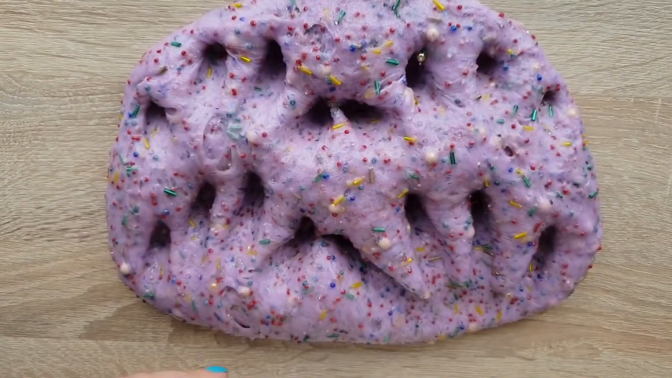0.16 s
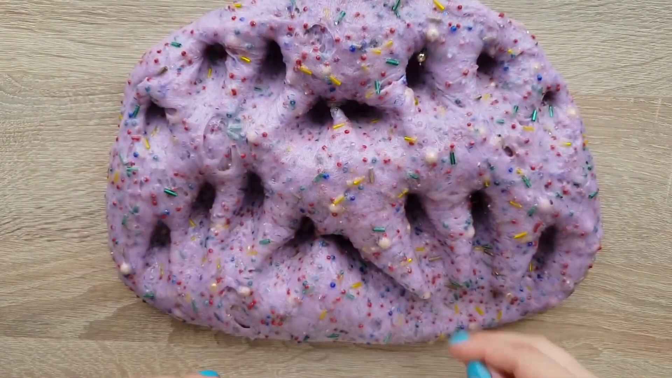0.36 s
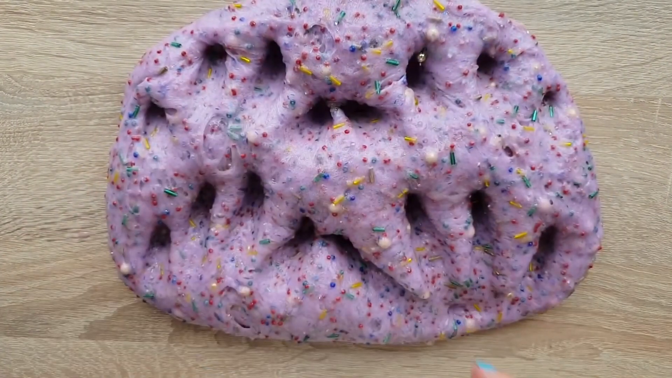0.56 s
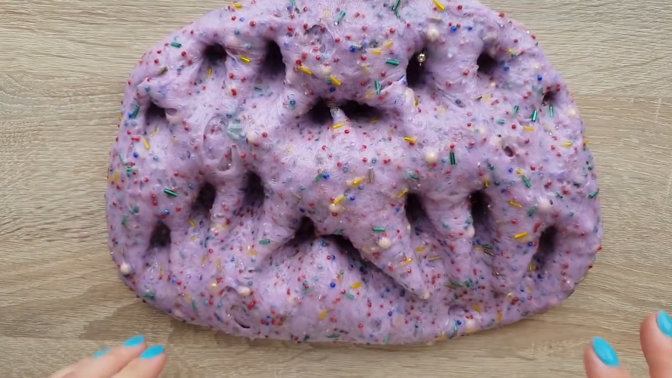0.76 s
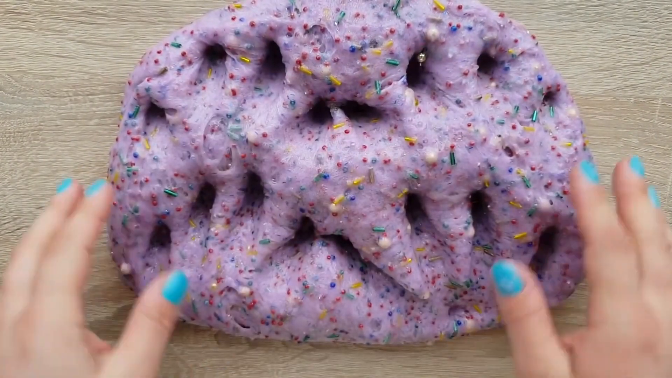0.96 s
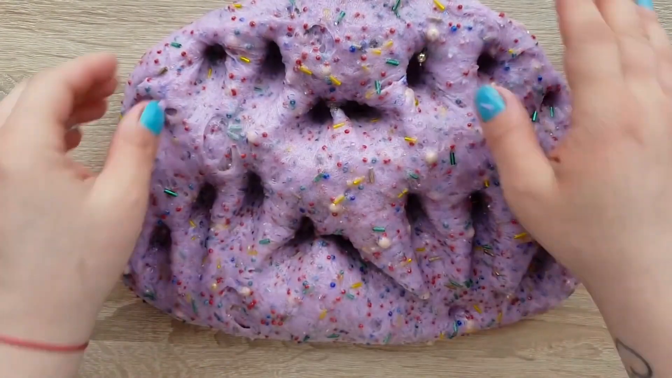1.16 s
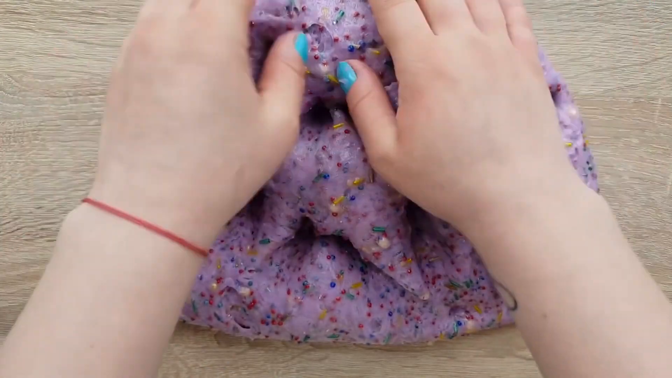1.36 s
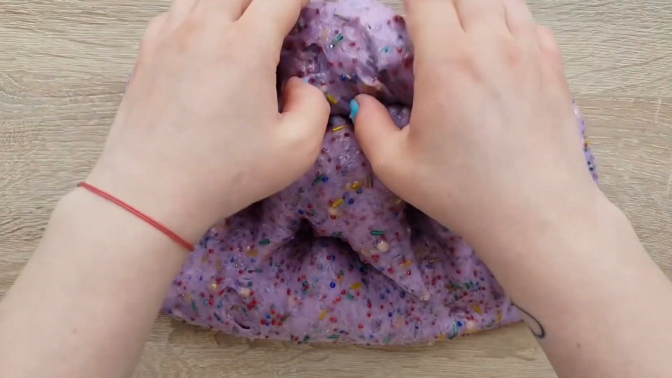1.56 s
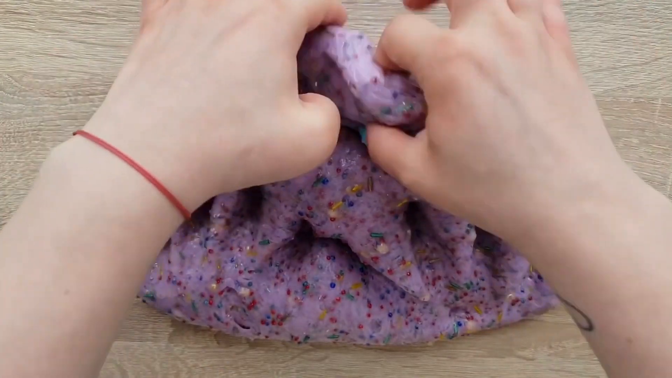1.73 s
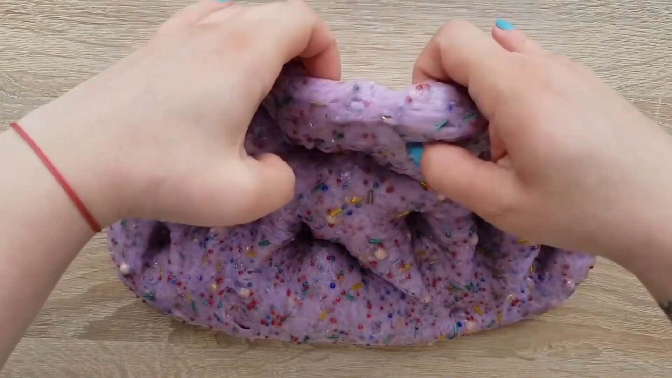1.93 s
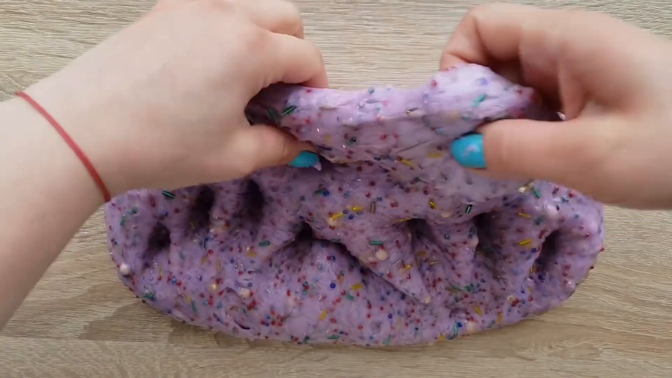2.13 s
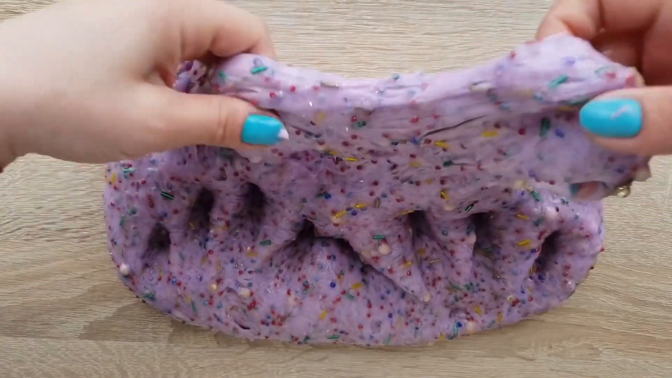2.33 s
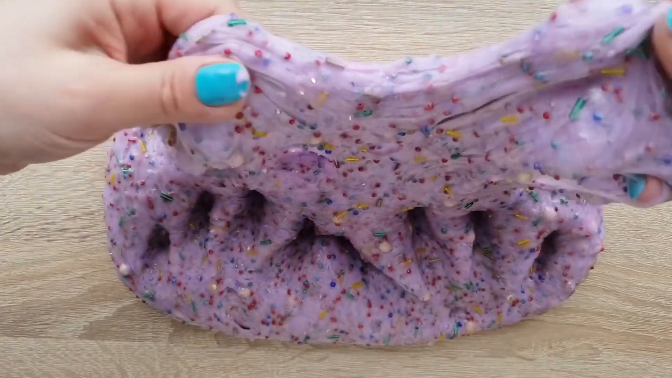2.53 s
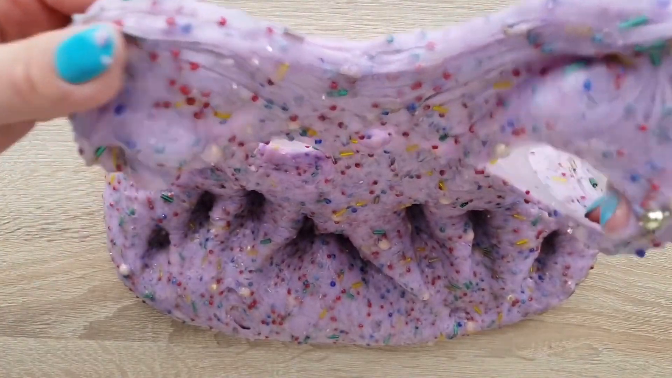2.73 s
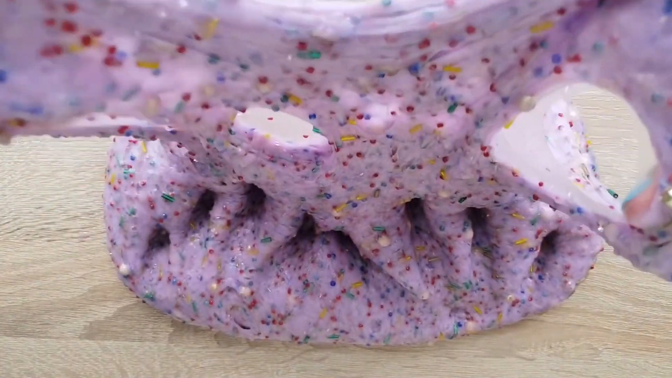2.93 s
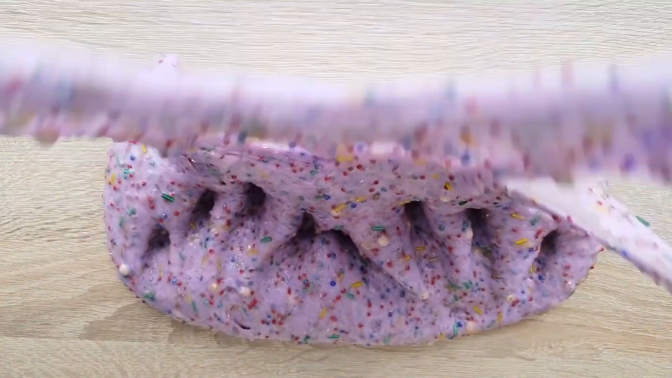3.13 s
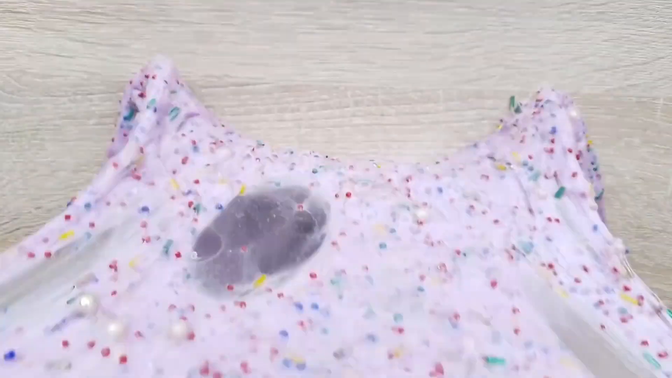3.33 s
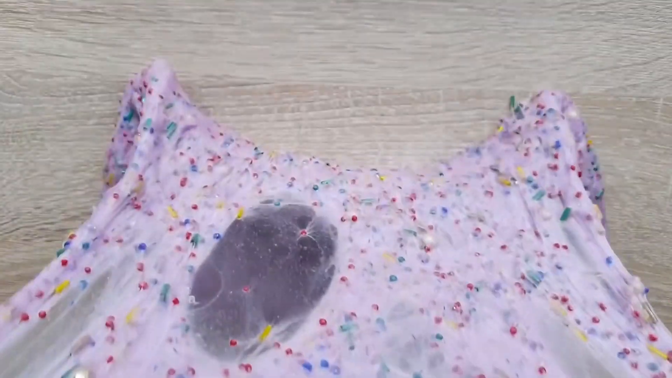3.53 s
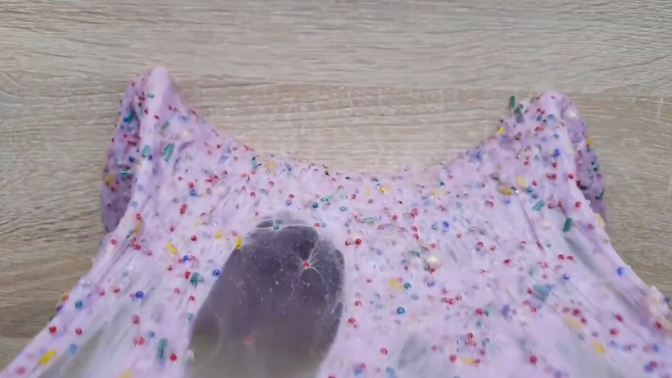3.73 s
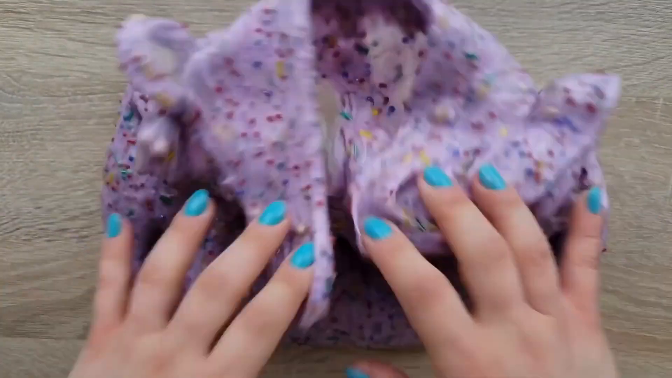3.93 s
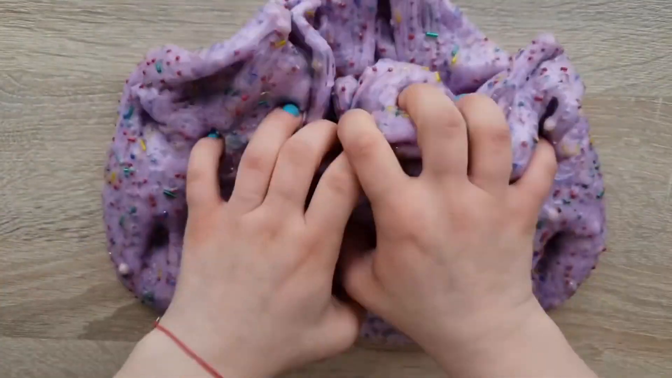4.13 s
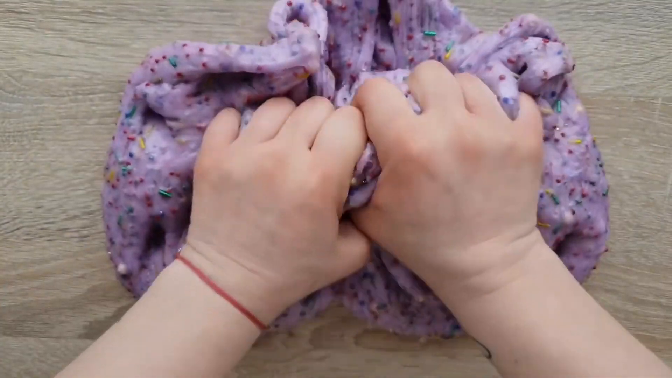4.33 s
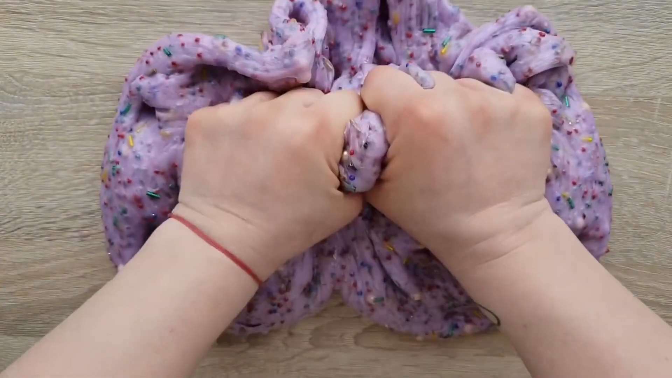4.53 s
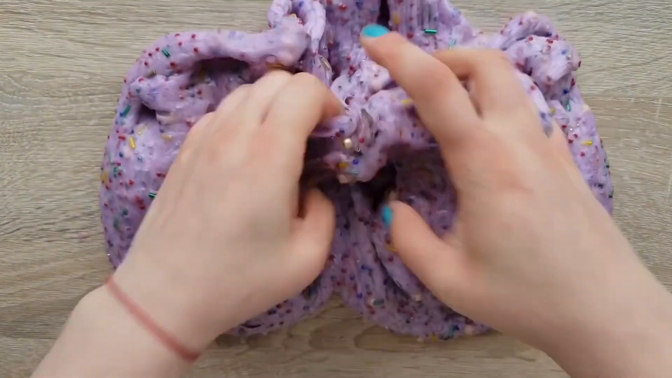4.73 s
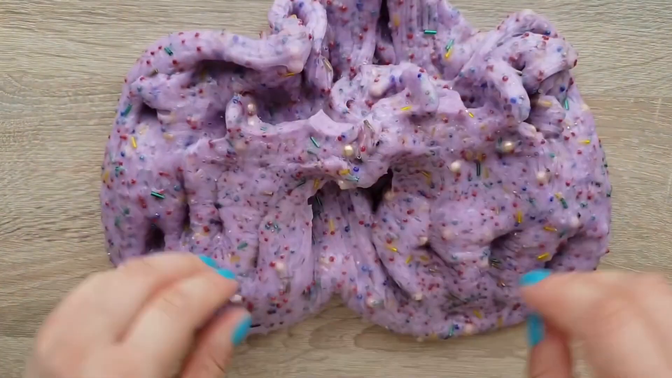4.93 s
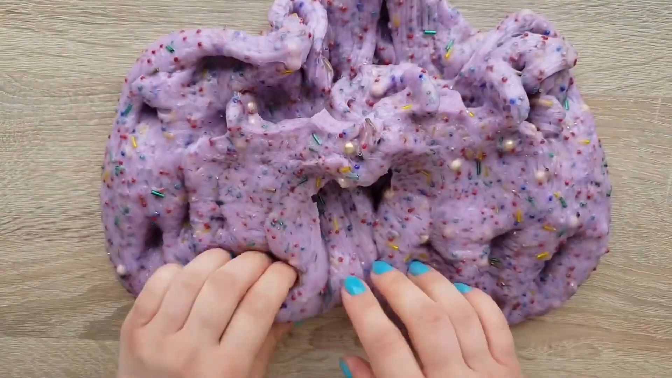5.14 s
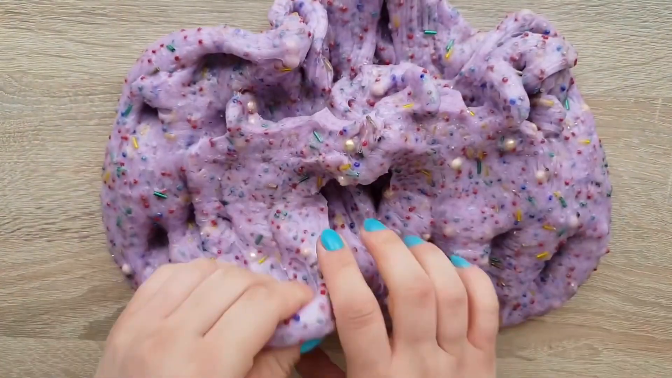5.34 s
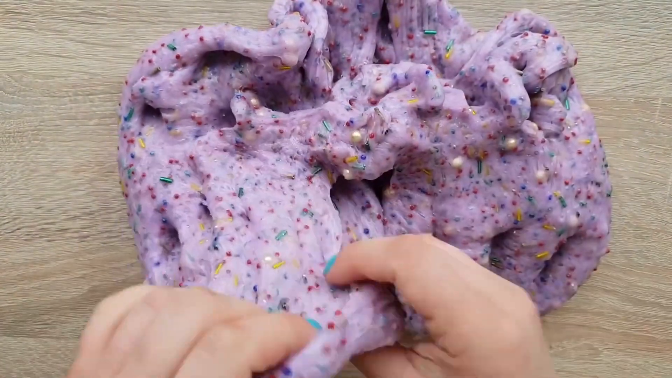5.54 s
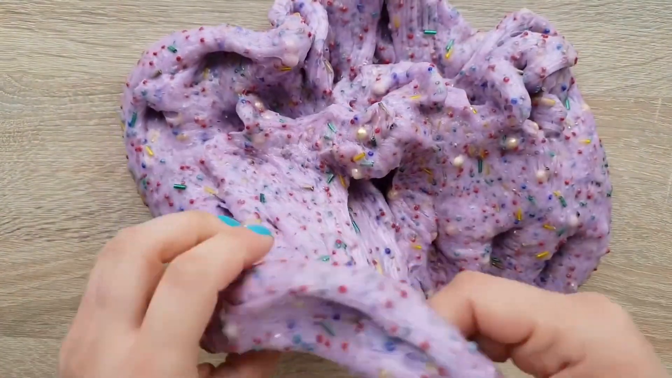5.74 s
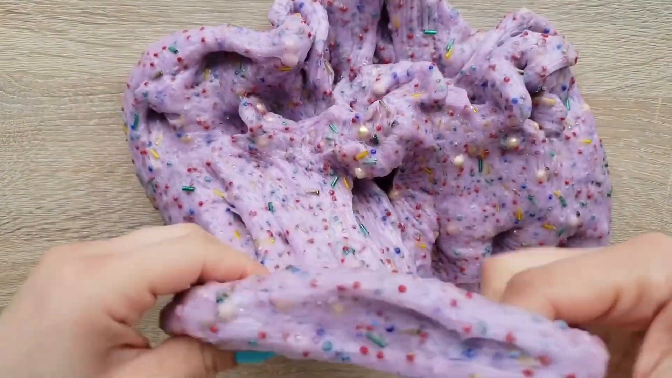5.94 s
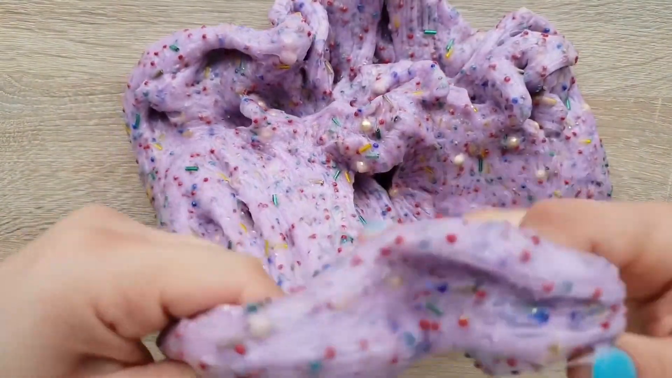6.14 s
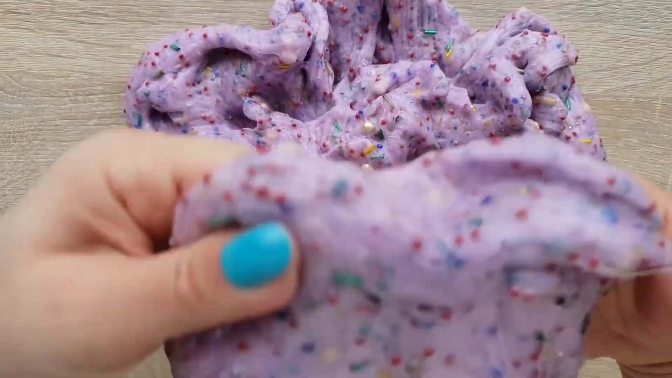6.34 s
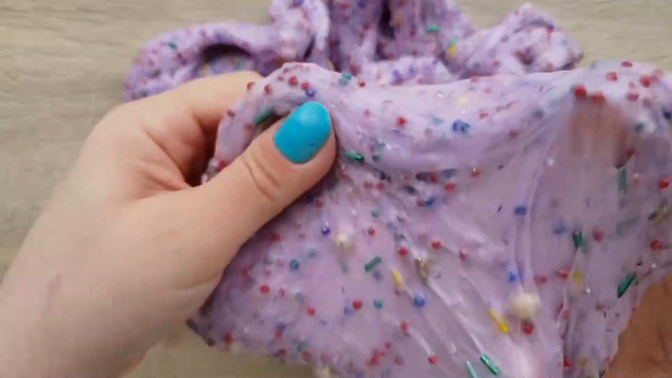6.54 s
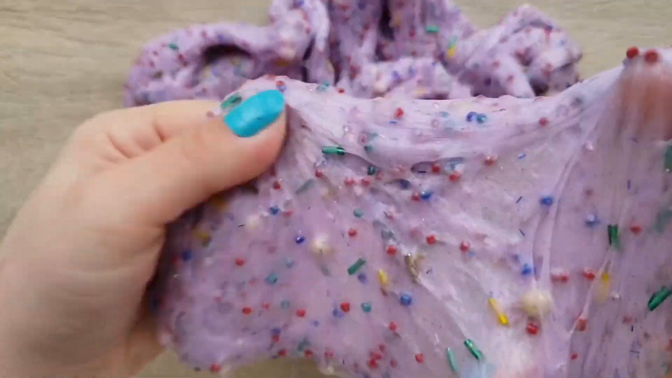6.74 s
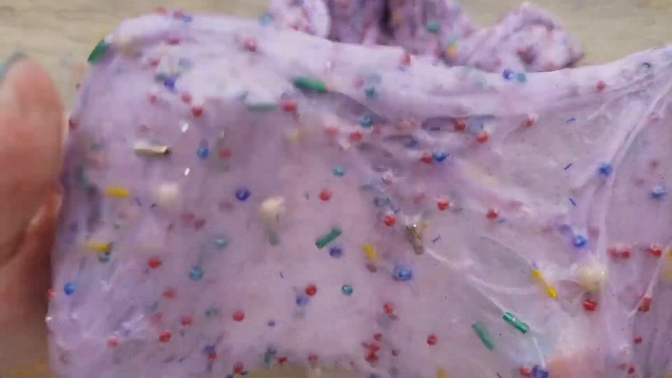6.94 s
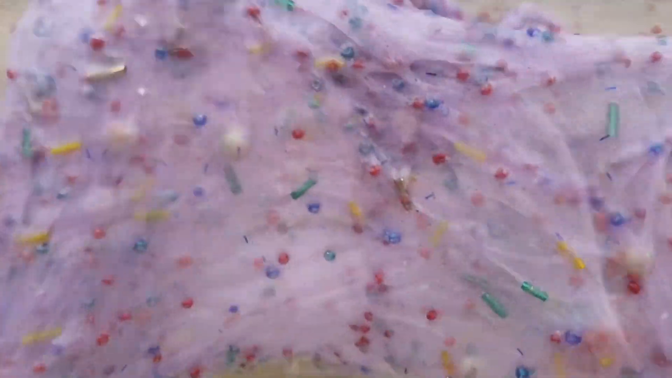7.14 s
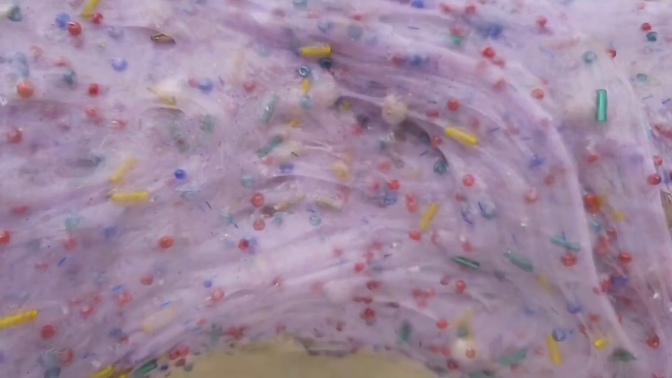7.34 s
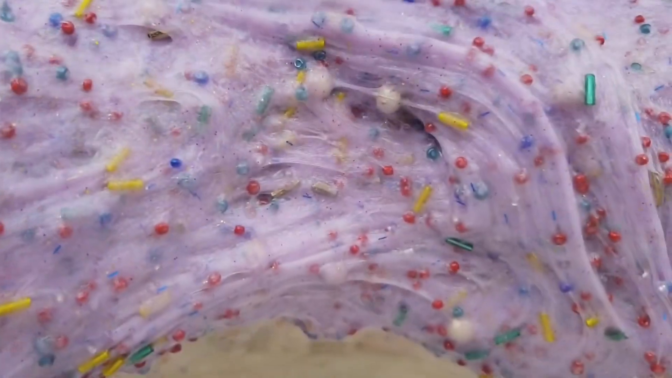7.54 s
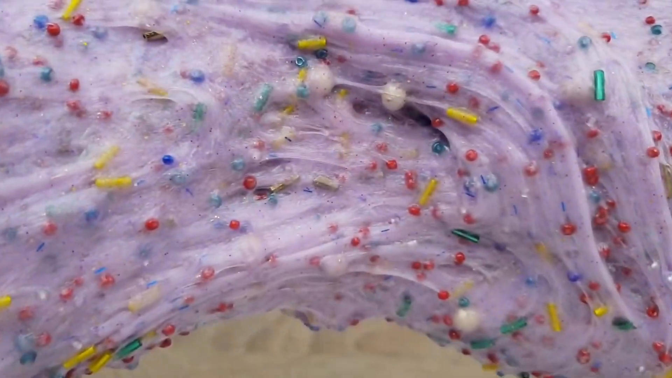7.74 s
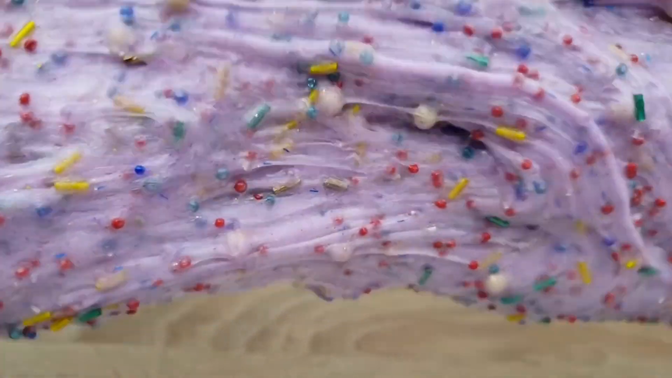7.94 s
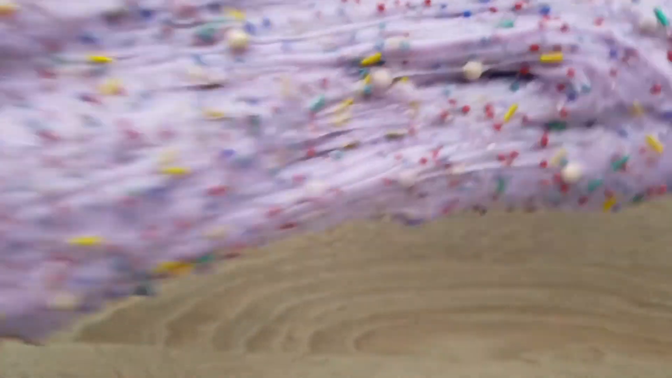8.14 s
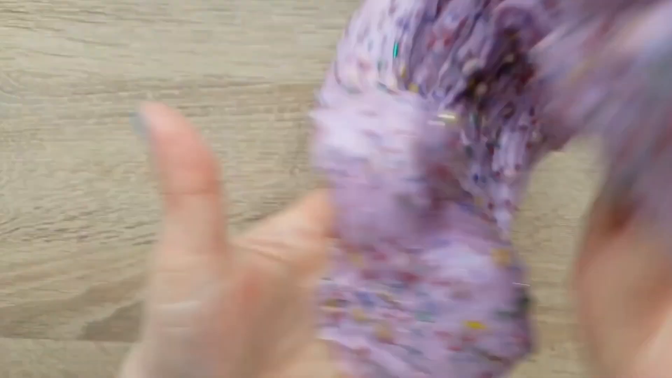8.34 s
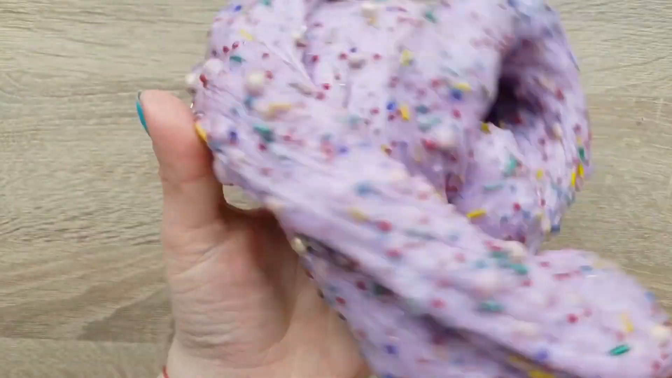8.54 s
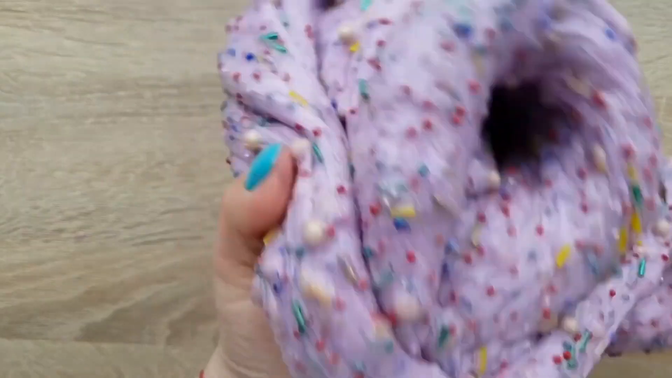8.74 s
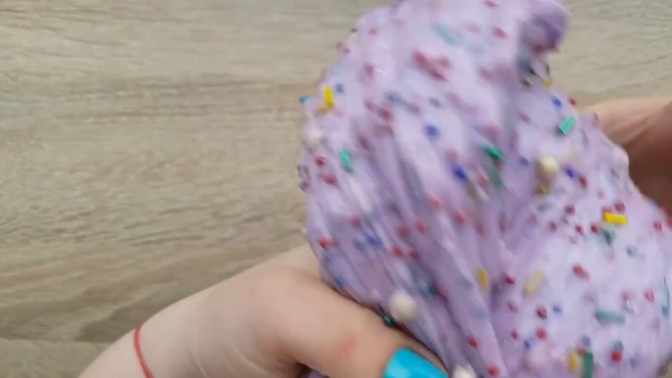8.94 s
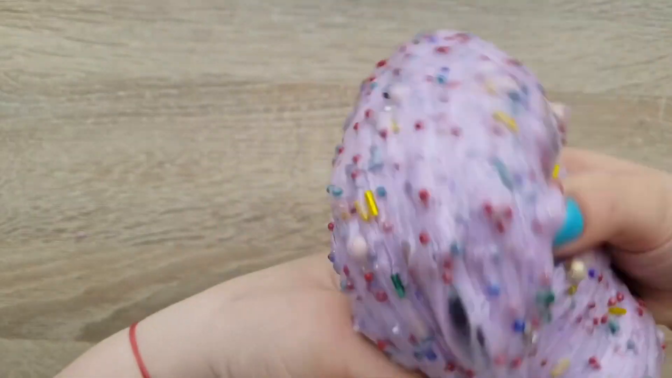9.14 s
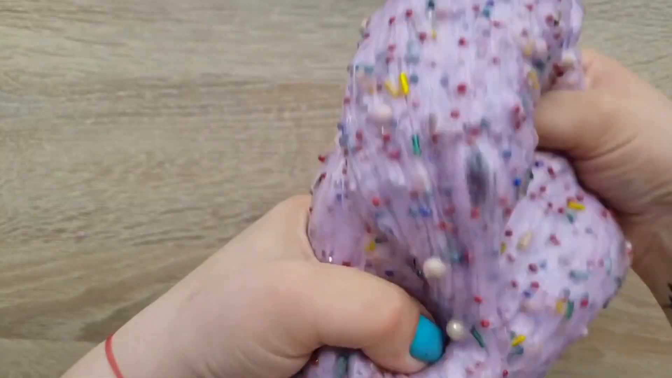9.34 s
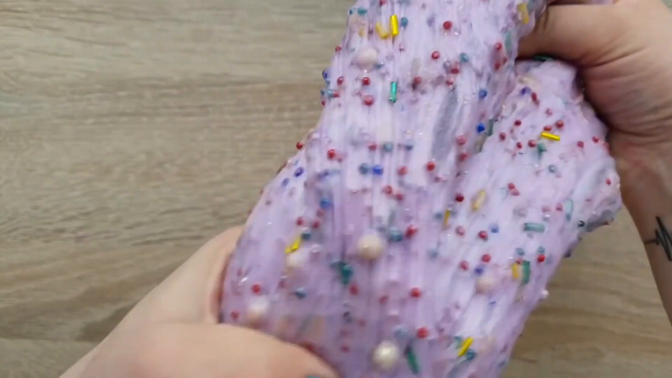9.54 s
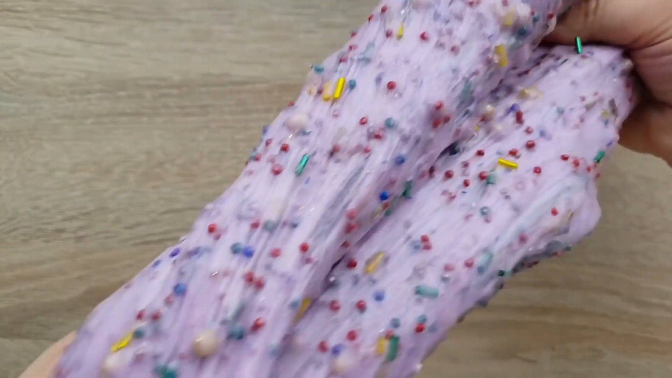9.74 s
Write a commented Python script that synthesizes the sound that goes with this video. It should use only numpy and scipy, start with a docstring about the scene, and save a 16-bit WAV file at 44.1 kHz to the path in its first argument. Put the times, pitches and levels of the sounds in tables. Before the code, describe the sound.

Close, wet crackling of beaded slime: crunchy squeezes, near-silent stretches, a heavy slap on wood, sharp snaps, then sparse crisp pops.

```python
"""Crunchy bead slime on a table

Two hands poke, stretch, fold and squeeze a big bead slime on a wooden table, close to a spaced microphone pair.
Thousands of tiny air pockets burst as short filtered clicks; larger ones pop singly as torn noise with a ring,
or open as gliding cavity tones. Resonant noise makes the air squirting from folds, the slime slapping down,
hardest at about four seconds, and the hands thudding on the table. A diffuse tail and one bounce make
the small room, over a bed of steady rumble, hiss and faint hum."""
import sys
import numpy as np
from scipy import signal
from scipy.fft import rfft, irfft, next_fast_len
from scipy.io import wavfile
from scipy.ndimage import uniform_filter1d

SR = 44100
rng = np.random.default_rng(int(sys.argv[2]) if len(sys.argv) > 2 else 0)


def inscribe(sig):
    """Save sig as 16-bit PCM at rate SR to the path in sys.argv[1].

    A 1-D sig is mono; a 2-D sig holds one channel per row.
    Samples are clipped to [-1, 1] before scaling.
    """
    pcm = np.round(np.clip(np.atleast_2d(sig).T, -1, 1) * 32767)
    wavfile.write(sys.argv[1], SR, pcm.astype(np.int16))


N = 431738
TIME = np.arange(N) / SR
EDGES = np.geomspace(160, 17000, 15)  # edges of the working bands, Hz

# In all tables, left-right/dB is left over right.
# Room background spectrum, only its shape counts: f/Hz, density/dB
AIR_SPECTRUM = [(12, -42), (20, -12.5), (33, 1.5), (86, -0.5), (116, -6), (163, -7.5), (187, -17.5),
                (228, -11.5), (285, -20), (527, -23.5), (825, -41.5), (1060, -31), (1710, -33.5),
                (16000, -31.5)]
AIR_DB = -57
# Steady hum lines: f/Hz, level/dB
HUM_LINES = [(43.1, -72.5), (75.4, -67.5), (226.1, -75.5)]
# Left-right correlation of diffuse sound: f/Hz, correlation/0-1
LIKENESS_BY_HZ = [(25, 0.97), (100, 0.7), (450, 0.5), (1200, 0.3), (3000, .05), (16000, 0.1)]
# Room tail against direct sound: f/Hz, level/dB
ROOM_LEVELS = [(100, -5.5), (400, -8), (1500, -3), (5000, -1), (15000, -0.5)]
# Time for the room tail to fall 60 dB: f/Hz, t60/s
ROOM_RING_TIMES = [(100, 0.31), (1000, 0.25), (5000, 0.33), (15000, 0.25)]
# Hands pressing on the table: t/s, level/dB, f/Hz, decay/s
TABLE_BUMPS = [(0.459, -47, 135, 0.041), (.57, -44, 140, 0.03), (1.384, -38, 106, 0.025),
               (1.483, -47.5, 116, .07), (1.928, -52, 129, 0.2), (4.009, -31, 75, 0.071),
               (4.01, -33.5, 150, 0.053), (4.13, -39.5, 75, .12), (4.459, -42.5, 132, .06),
               (4.73, -36, 173, 0.08), (4.82, -39.5, 74.5, 0.07), (4.97, -47.5, 151, .08),
               (5.12, -45.5, 134, .06), (5.129, -49.5, 69, 0.18), (5.31, -39, 124, 0.062),
               (8.36, -50.5, 121, 0.14), (9.578, -48, 110, 0.033), (9.6, -41, 55, 0.055)]
# Air squeezed out of a fold: middle t/s, half length/s, f/Hz, relative width/ratio, level/dB
AIR_SQUIRTS = [(0.603, .04, 560, 0.27, -57.5), (0.984, 0.059, 548, 0.12, -64.5),
               (1.553, 0.047, 921, 0.016, -47), (1.796, 0.055, 910, .05, -48.5),
               (2.148, 0.027, 2720, 0.14, -48), (2.271, .028, 1200, 0.22, -48),
               (3.915, 0.047, 530, 0.22, -60), (4.025, .02, 826, .2, -29.5),
               (4.705, 0.011, 582, 0.061, -35.5), (4.76, .036, 1950, 0.38, -30.5),
               (5.163, 0.012, 962, 0.043, -44), (5.38, 0.048, 1200, 0.35, -40.5),
               (5.387, 0.059, 516, 0.29, -36.5), (6.024, 0.0094, 2000, .17, -42),
               (6.191, 0.012, 880, 0.4, -52.5), (8.312, 0.0096, 1182, 0.18, -36.5),
               (8.522, 0.01, 1360, .18, -45), (8.564, 0.031, 2150, 0.35, -47),
               (8.888, 0.02, 3630, 0.22, -41.5), (9.308, 0.012, 2010, 0.25, -41),
               (9.359, 0.045, 300, 0.31, -49), (9.529, 0.049, 286, 0.28, -49)]
# Slime landing on the table or on itself: t/s, level/dB, decay/s
SLIME_SLAPS = [(0.562, -39, 0.0071), (4.007, -11, 0.018), (4.368, -17, 0.0018), (5.311, -28, 0.013),
               (8.274, -41, 0.0093)]
# Hollow ring of slime and table, balance within a slap: f/Hz, width/Hz, level/dB
HOLLOW_MODES = [(200, 290, -11), (350, 190, -5), (570, 45, 5.5), (870, 79, 11), (1230, 420, 1),
                (1570, 98, -11.5), (1940, 250, -5.5), (3300, 4860, -6)]
# Table resonances under the slime, gain on the crackle: f/Hz, width/Hz, level/dB
TABLE_RESONANCES = [(267, 15, -12), (445, 24, -1.5), (541, 12, 7.5), (600, 17, -13), (890, 32, -14),
                    (934, 13, -7), (1336, 27, -4), (1470, 14, -11)]
LIFT_S, LIFT_TAKES_S, LIFTED_DB = 5.6, .3, -5.5  # slime taken up off the table, which then rings less
# Big pockets opening, before a common trim: t/s, level/dB, f/Hz, decay/s
POCKET_PLOPS = [(.565, -38, 560, 0.014), (.567, -38.5, 368, 0.012), (1.879, -32, 560, 0.0032),
                (2.2465, -22.5, 1230, 0.0033), (2.247, -22, 2080, 0.0019), (2.024, -32, 328, .003),
                (2.366, -31, 910, 0.005), (2.366, -30, 400, 0.0039), (2.425, -28.5, 420, 0.0086),
                (2.501, -21, 455, 0.002), (4.155, -22.5, 915, 0.0022), (4.196, -26.5, 770, 0.0045),
                (4.369, -18, 1880, 0.0043), (4.411, -26, 1170, 0.004), (4.469, -19.5, 1350, 0.0025),
                (4.497, -21, 356, 0.0028), (4.731, -24, 323, 0.0056), (5.313, -22, 540, 0.0042),
                (5.42, -23.5, 443, .0054), (6.1765, -44.5, 863, 0.0036), (8.276, -32, 805, 0.0037),
                (8.754, -38, 277, 0.014), (8.755, -35, 1200, 0.0019), (9.32, -23.5, 1980, 0.0016),
                (9.343, -28, 317, 0.0042), (9.524, -29.5, 310, .0055), (9.6685, -0.5, 2750, 0.00039),
                (9.748, -28, 1060, 0.0024)]
# Loudest single pops, before a common trim: t/s, level/dB (energy packed into 1 ms), f/Hz,
# spread/octaves, left-right/dB
SINGLE_POPS = [(0.5648, -21.5, 7960, 0.76, 4), (1.506, -24.5, 7800, .65, 3), (1.553, -17.5, 4270, 0.47, -5),
               (1.5972, -26, 3700, 1.1, -15), (1.7359, -21.5, 9300, 0.7, 2),
               (1.9331, -10.5, 9900, 0.87, -1.5), (2.0136, -25, 4300, 0.67, -6),
               (2.3412, -28, 7000, 1.2, -1), (2.3668, -21.5, 3780, 0.51, 9), (2.405, -20.5, 10700, 0.3, -4),
               (2.4258, -21, 2800, 1.9, -3), (2.469, -17, 9600, 0.38, 0.5), (2.749, -41, 6200, .9, 1.5),
               (3.2202, -36.5, 9700, 0.41, -2), (3.327, -28.5, 8800, 0.39, 20),
               (3.9693, -27.5, 5750, 0.59, 3), (4.0089, -6, 3300, 1.8, 0), (4.0118, -11.5, 1190, 1.1, 8),
               (4.0365, -12.5, 5500, 1.8, 4), (4.088, -21.5, 7500, 0.41, 5),
               (4.2269, -16.5, 6470, 0.43, -6), (4.294, -17, 7160, 0.79, 2), (4.3188, -14, 8400, 0.58, 6),
               (4.356, -22.5, 3793, 0.77, -0.5), (4.368, -14, 5000, 0.86, 8.5), (4.372, -8, 4160, .85, 2),
               (4.418, -12.5, 8000, 0.31, 0), (4.4697, -2, 6100, 0.65, 0.5), (4.4983, -4.5, 7800, 0.94, 0),
               (4.502, -9, 7000, 0.36, -1), (4.529, -7.5, 8500, 0.45, 6), (4.534, -12, 11300, 0.94, -2.5),
               (4.5804, -21, 8200, 0.25, 6), (4.6158, -22.5, 2870, 0.36, -1),
               (5.1834, -21.5, 2200, 0.38, 1), (5.202, -9, 8800, 0.28, -2),
               (5.3137, -15.5, 4700, 0.42, 2.5), (5.4775, -25, 8650, 0.62, 12),
               (5.528, -19.5, 8800, 0.77, 11), (5.6607, -33, 2250, 0.71, 0), (5.729, -32.5, 5400, .6, -10),
               (8.1868, -31, 7670, 0.33, 7), (8.2768, -27, 3100, 0.23, -2), (8.593, -24.5, 5700, 1.1, -4),
               (8.632, -25.5, 4600, 1.2, -2), (8.7991, -27, 9400, 1, -2), (9.0373, -24, 6860, 0.45, 2),
               (9.056, -28.5, 5660, 0.61, 0), (9.0667, -21.5, 10050, 0.6, -1),
               (9.0815, -16.5, 10200, 0.69, -2.5), (9.1393, -26, 8600, .5, -12),
               (9.144, -25.5, 6000, 1.2, -8), (9.1613, -23, 7900, .6, 2), (9.2096, -25, 4340, 0.61, 6),
               (9.2551, -25.5, 6200, 0.73, 1), (9.3542, -24, 9050, .5, 1), (9.4791, -23, 4700, 0.88, -2),
               (9.4942, -23, 4700, 1, 3), (9.524, -23.5, 4280, 0.33, -4), (9.6684, -16, 5200, 1.1, 3.5),
               (9.749, -25.5, 6200, 1.2, 2)]
# Pitches of large, ordinary and tiny pockets: f/Hz
POCKET_PITCHES = [350, 2800, 9800]
# Where the hands work: t/s, left-right/dB
HAND_PATH = [(0, -0.5), (1.6, 3), (2.4, 2), (3.0, 5), (3.33, 6.5), (3.7, 3), (4.5, 1.5), (5.3, 1.5),
             (6.0, 2), (6.9, 6), (7.6, 4), (8.4, 2.1), (9.1, 3), (9.78, 1)]
SCATTER_DB = 6  # spread of the pockets across the slime, left-right
# Tone of the crackle, before a common trim: f/Hz, level/dB
CRACKLE_EQ = [(180, -11), (270, -3), (380, -6.5), (550, -8), (900, -3.5), (1500, -5), (2500, -1), (4000, 1),
              (6000, -0.5), (8500, 2), (12000, 0.5), (15000, 0)]
# Unevenness of the bursts, even fizz near 0 and lone snaps when high: t/s, size spread/dB
SNAP_SPREAD = [(0, 5), (1.55, 4), (2.0, 2.5), (2.45, 7), (3.2, -3), (3.9, 6.5), (4.3, 8.5), (4.6, 8.5),
               (4.72, 3), (5.35, 3.5), (5.7, 7.5), (6.0, 1.5), (8.3, 2), (8.9, 6), (9.1, 8.5), (9.35, 7),
               (9.75, 9)]
# Pressing or folding: fully pressed t/s, attack/s, hold/s, level/dB,
# large pockets against ordinary/dB, tiny against ordinary/dB
HAND_SQUEEZES = [(0.446, .01, 0.0092, -60, -1, 7.5), (0.554, 0.049, 0.0085, -56, 5, 12),
                 (1.539, 0.056, 0.042, -32, -8.5, 0), (1.729, 0.06, 0.0092, -43, -2.5, -1),
                 (1.827, 0.18, 0.23, -41.5, -5.5, 1.5), (1.939, .006, 0.025, -35, -3.5, 1.5),
                 (1.997, 0.045, 0.088, -32.5, -2.5, -1.5), (2.134, .05, 0.15, -38.5, -6, -3.5),
                 (2.352, 0.044, 0.056, -40, -3, 2.5), (2.439, 0.058, 0.082, -38, -1, 0),
                 (2.555, .03, 0.045, -52.5, 7, 6), (4.004, 0.021, 0.03, -31, 2.5, -5),
                 (4.087, .03, 0.14, -38.5, 3.5, 2), (4.231, 0.059, 0.18, -32, -9, -4),
                 (4.34, 0.089, 0.1, -30.5, -6, -1.5), (4.489, 0.047, 0.036, -26.5, -6, -2),
                 (4.582, 0.026, 0.038, -39.5, -7, 0.5), (4.695, 0.025, 0.029, -30, -1, -2.5),
                 (4.739, 0.035, 0.046, -28.5, 3, -2.5), (5.173, 0.05, 0.14, -42.5, -1.5, -4.5),
                 (5.313, 0.02, .11, -34.5, -2, 0.5), (5.472, .03, 0.072, -38.5, 2.5, 1),
                 (5.593, .03, 0.019, -46.5, 2, -0.5), (8.313, .05, 0.15, -41, 2, 1),
                 (8.47, 0.089, 0.089, -48.5, -6, 7), (8.558, 0.051, 0.1, -42.5, -4, -0.5),
                 (8.748, .05, .05, -47, 4, -3.5), (9.318, 0.05, .04, -37.5, -16, 2),
                 (9.487, 0.13, 0.058, -38.5, -8, 1), (9.569, .03, 0.022, -40.5, -9, 1.5)]
ATTACK_RISE_DB = 20  # rise over one attack time
SAG_DB_PER_S, RELEASE_DB_PER_S = 25.5, 258.5  # pockets run out under the grip; after the hold the crackle dies away fast
# Drawing the slime out, a swell of fizz: middle t/s, half length/s, level/dB,
# large pockets against ordinary/dB, tiny against ordinary/dB
HAND_PULLS = [(1.2, .15, -68.5, 2.5, -5), (1.464, 0.02, -59, 4, 15.5), (2.722, 0.045, -57.5, -23, 4.5),
              (3.016, 0.11, -70.5, -11, 12), (3.245, 0.037, -63.5, -8, 12), (3.32, 0.021, -56, -13, 10),
              (3.581, 0.028, -60, 3, 10), (3.695, 0.046, -59, -26, 11), (3.875, 0.041, -52.5, -29, 12),
              (3.976, .015, -40, 0, -3), (5.69, 0.048, -45, -16, -1), (5.82, 0.054, -65.5, -17, 8),
              (5.984, 0.028, -48, -27, 4), (6.022, 0.019, -40.5, -25, -4), (6.2, 0.15, -61, -14, 5),
              (6.408, 0.11, -61, -12, 10), (6.428, 0.014, -52.5, -5, 1), (6.619, 0.041, -58.5, -13, 8),
              (6.75, .03, -67, -10, 14), (6.854, 0.025, -57.5, 2, 12), (6.95, .018, -56.5, -13, 14.5),
              (7.96, .015, -58, 3, 0), (8.088, 0.089, -52, -13, -1), (8.25, .03, -57, -19, 4),
              (8.712, 0.055, -49.5, -13, -3), (8.896, 0.028, -50.5, -2, 6.5), (8.97, 0.056, -54, -12, 4),
              (9.081, 0.019, -41.5, -14, -12), (9.169, 0.027, -43, -19, 1), (9.266, 0.035, -44.5, -16, -1),
              (9.693, 0.035, -39, -10.5, -9), (9.768, 0.028, -40, -13, 0.5)]
REST_DB = -71.5  # slime settling on its own
SLIP_DB, SLIPS_PER_S = 3.5, 110  # stick and slip: the whole crackle stutters
FOLD_DB, FOLDS_PER_S = 2, 35  # shifting folds lift and muffle each band on its own
CUTOFF_HZ = 15950


def from_db(db):
    """Turn decibels into gain."""
    return 10 ** (np.asarray(db) / 20)


def rms_one(x):
    """Scale to rms 1."""
    return x / np.sqrt(np.mean(x ** 2) + 1e-20)


def at_hz(points, hz):
    """Read a spectrum on a log-frequency axis."""
    f, value = np.transpose(points)
    return np.interp(np.log(np.maximum(hz, 1)), np.log(f), value)


def band(x, low, high, order=2):
    """Causal band-pass."""
    sos = signal.butter(order, [low, min(high, .47 * SR)], "band", fs=SR, output="sos")
    return signal.sosfilt(sos, x + 1e-18)


def add(out, sound, s):
    """Mix a stereo sound in at time s."""
    i = max(round(s * SR), 0)
    out[:, i:i + sound.shape[1]] += sound[:, :N - i]


def pan(db):
    """Left and right gains of equal total power."""
    gains = from_db(np.array([db, -db]) / 2).reshape(2, -1)
    return gains / np.sqrt(np.mean(gains ** 2, axis=0))


def drift(s, per_s):
    """A random wander with about per_s turns a second, read at times s."""
    knots = np.linspace(0, TIME[-1], int(TIME[-1] * per_s) + 2)
    return np.interp(s, knots, rng.standard_normal(len(knots)))


def diffuse(size, spectrum=((20, 0), (20000, 0))):
    """Stereo noise of rms 1, most alike at both microphones in the bass."""
    padded = next_fast_len(size)
    hz = np.arange(padded // 2 + 1) * SR / padded
    alike = np.clip(at_hz(LIKENESS_BY_HZ, hz), 0, 1)
    mid, side = rfft(rng.standard_normal((2, padded)))
    both = np.sqrt(1 + alike) * mid + np.sqrt(1 - alike) * side * [[1], [-1]]
    return rms_one(irfft(both * from_db(at_hz(spectrum, hz)), padded)[:, :size])


def background(waver=0.2):
    """Steady rumble and hiss with a faint wavering hum."""
    knots = np.linspace(0, TIME[-1], 40)
    hum = np.zeros(N)
    for hz, db in HUM_LINES:
        swell = 1 + waver * np.interp(TIME, knots, rng.standard_normal(len(knots)))
        hum += from_db(db) * np.sqrt(2) * np.sin(2 * np.pi * hz * TIME) * swell
    return (from_db(AIR_DB) * diffuse(N, AIR_SPECTRUM) + hum) * pan(1.2)


def room_response(first_s=0.00031, bounce_s=0.0094, bounce_db=-17):
    """A diffuse tail that dies band by band, and one bounce off a near surface."""
    t = TIME[:SR // 2]
    response = np.zeros((2, len(t)))
    for low, high in zip(EDGES, EDGES[1:]):
        hz = np.sqrt(low * high)
        decay = from_db(-60 * t / at_hz(ROOM_RING_TIMES, hz))
        tail = band(diffuse(len(t)) * decay * (1 - np.exp(-t / first_s)), low, high)
        band_share = np.sqrt(2 * (high - low) / SR / len(t))
        response += rms_one(tail) * from_db(at_hz(ROOM_LEVELS, hz)) * band_share
    response[:, round(bounce_s * SR)] += from_db(bounce_db)
    return response


def room(x, count=4, moves_per_s=40):
    """The bursts hop about on the slime, so the sound wanders among a few sets of room paths."""
    shares = np.array([drift(TIME, moves_per_s) for _ in range(count)])
    shares = shares / np.sqrt(np.sum(shares ** 2, axis=0))
    return sum(signal.oaconvolve(x * share, room_response(), axes=1)[:, :N] for share in shares)


def bumps(width=0.36, rise_s=0.0062):
    """Soft pushes make the table top thud."""
    out, t = np.zeros((2, N)), TIME[:SR // 2]
    for s, db, hz, decay in TABLE_BUMPS:
        push = diffuse(len(t)) * (1 - np.exp(-t / rise_s)) * np.exp(-t / decay)
        thud = rms_one(band(push, hz / (1 + width), hz * (1 + width)))
        add(out, thud * from_db(db) * np.sqrt(decay / 2 / t[-1]), s)  # level refers to half the decay time
    return out * pan(1.6)


def squirts():
    """Escaping air hisses through the resonance of the fold that it leaves."""
    out, t = np.zeros((2, N)), TIME[:SR // 2] - 1 / 4
    for s, half, hz, width, db in AIR_SQUIRTS:
        hiss = rms_one(band(diffuse(len(t)), hz / (1 + width), hz * (1 + width)))
        add(out, hiss * from_db(db) * np.exp(-(t / half) ** 2 / 2), s + t[0])
    return out * pan(1.2)


def slaps(patter_db=4):
    """Wet contact spreads in a quick patter that rings the hollows under the slime."""
    out, t = np.zeros((2, N)), TIME[:SR // 4]
    knots = t[::60]
    for s, db, decay in SLIME_SLAPS:
        patter = from_db(patter_db * np.interp(t, knots, rng.standard_normal(len(knots))))
        contact = diffuse(len(t)) * patter * np.exp(-t / decay)
        ring = 0
        for hz, width, mode_db in HOLLOW_MODES:
            mode = band(contact, max(hz - width / 2, 20), hz + width / 2, order=1)
            ring = ring + from_db(mode_db) * rms_one(mode)
        add(out, rms_one(ring) * from_db(db) * np.sqrt(decay / 2 / t[-1]), s)
    return out


def table(x):
    """The table top rings along at its own few pitches, more weakly once the slime is lifted."""
    contact = from_db(LIFTED_DB * np.clip((TIME - LIFT_S) / LIFT_TAKES_S, 0, 1))
    centre = x.mean(axis=0) * contact
    ring = sum(from_db(db) * band(centre, hz - width / 2, hz + width / 2, order=1)
               for hz, width, db in TABLE_RESONANCES)
    return pan(1.4) * ring


def cavity(hz, decay, glide=0.14, rise_s=0.00087):
    """A pocket rings like a cavity whose mouth widens, so its pitch climbs."""
    t = TIME[:SR // 10]
    pitch = hz * (1 + glide * (np.tanh(t / decay / 2) - .5))
    return np.sin(2 * np.pi * np.cumsum(pitch) / SR) * np.exp(-t / decay) * (1 - np.exp(-t / rise_s))


def plops(level_db=3):
    """The biggest pockets open one by one with a hollow ring."""
    out = np.zeros((2, N))
    for s, db, hz, decay in POCKET_PLOPS:
        add(out, cavity(hz, decay) * from_db(db + level_db) * pan(1.5), s)
    return out


def pops(ring_cycles=0.61, rise_s=0.00029, crack_s=0.00037, crack_db=-1, tail_s=0.0031, tail_db=-18,
         lag_s=.000028, level_db=1):
    """A film tears with a crack, the opened pocket rings very briefly and the slime around it rustles."""
    out, t = np.zeros((2, N)), TIME[:700]
    for s, db, hz, octaves, side_db in SINGLE_POPS:
        late = lag_s * np.tanh(side_db / 4) * np.array([[-1], [1]])  # the ring leads at the nearer microphone
        ring = np.sin(2 * np.pi * hz * (t - late)) * np.exp(-t * hz / ring_cycles)
        tear = diffuse(len(t)) * (np.exp(-t / crack_s) + from_db(tail_db) * np.exp(-t / tail_s))
        crack = band(tear, hz / 2 ** (1.6 * octaves), hz * 2 ** (1.38 * octaves))
        ring_gain = .5 / max(octaves, .3)  # narrow pops ring more
        pop = rms_one(ring) * ring_gain + from_db(crack_db) * rms_one(crack)
        pop = rms_one(pop * (1 - np.exp(-t / rise_s))) * np.sqrt(SR / 1000 / len(t))
        add(out, pop * from_db(db + level_db) * pan(side_db), s)
    return out


def pocket_levels(s):
    """Levels in dB of large, ordinary and tiny pockets at times s: squeezes and pulls add in power."""
    t = TIME[::44]
    power = from_db(REST_DB) ** 2
    for start, attack, hold, db, bass_db, treble_db in HAND_SQUEEZES:
        age = t - start
        fall = ATTACK_RISE_DB * np.maximum(-age, 0) / attack
        fall += SAG_DB_PER_S * np.maximum(age, 0)
        fall += RELEASE_DB_PER_S * np.maximum(age - hold, 0)
        power = power + np.outer(from_db([bass_db, 0, treble_db]), from_db(db - fall)) ** 2
    for middle, half, db, bass_db, treble_db in HAND_PULLS:
        swell = from_db(db) * np.exp(-((t - middle) / half) ** 2 / 2)
        power = power + np.outer(from_db([bass_db, 0, treble_db]), swell) ** 2
    return np.array([np.interp(s, t, 10 * np.log10(p)) for p in power])


def bubbling(count=1100, low_hz=350, high_hz=3400, cycles=2.2, level_db=-1, size_db=4):
    """Among the crackle, wet pockets ring for a few cycles and round off the squelch."""
    out, draws = np.zeros((2, N)), rng.random((count, 4))
    times = draws[:, 0] * TIME[-1]
    for s, levels, (height, size, spot) in zip(times, pocket_levels(times).T, draws[:, 1:]):
        hz = low_hz * (high_hz / low_hz) ** height
        db = np.interp(np.log(hz), np.log(POCKET_PITCHES), levels)
        db += level_db + size_db * (2 * size - 1.5)
        hands_db = np.interp(s, *np.transpose(HAND_PATH))
        side_db = hands_db + SCATTER_DB * height * (2 * spot - 1)  # high ones are placed wider
        add(out, cavity(hz, cycles / hz) * from_db(db) * pan(side_db), s)
    return out


def crackle(per_s=2600, spread_octaves=1.66, lag_s=.00011, shadow_hz=2500, level_db=-8.0):
    """Pockets burst at random; each is a click coloured around its own pitch and placed at its own spot."""
    born = np.flatnonzero(rng.random(N - 100) < per_s / SR)
    s, count = born / SR, len(born)
    spread_db = np.interp(s, *np.transpose(SNAP_SPREAD))
    size = from_db(spread_db * np.minimum(rng.standard_normal(count), 2.6))
    pitch = np.exp(rng.uniform(np.log(200), np.log(20000), count))
    hands_db = np.interp(s, *np.transpose(HAND_PATH))
    spot_db = SCATTER_DB * rng.standard_normal(count)
    lag = np.round(lag_s * SR * rng.standard_normal(count) / 2).astype(int)  # half the left-right delay
    levels = pocket_levels(s) + SLIP_DB * drift(s, SLIPS_PER_S)
    out = np.zeros((2, N))
    for low, high in zip(EDGES, EDGES[1:]):
        hz = np.sqrt(low * high)
        # how far this band follows large, ordinary and tiny pockets
        shares = np.array([np.interp(np.log(hz), np.log(POCKET_PITCHES), row)
                           for row in np.eye(len(POCKET_PITCHES))])
        distance = np.log2(hz / pitch) / spread_octaves
        push = size * np.exp(-distance ** 2 / 2) * rng.standard_normal(count)
        # even out the running energy, so that the hands set it
        push = push / np.sqrt(uniform_filter1d(push ** 2, size=200) + 1e-12)
        fold_db = FOLD_DB * drift(s, FOLDS_PER_S)
        push *= from_db(shares @ levels + at_hz(CRACKLE_EQ, hz) + fold_db + level_db)
        push *= SR / np.sqrt(2 * per_s * (high - low))  # click density and bandwidth to rms
        sides = pan(hands_db + spot_db * min(hz / shadow_hz, 1))  # spots spread less in the bass
        clicks = [np.bincount(np.clip(born + way * lag, 0, N - 1), push * side, N)
                  for way, side in zip((-1, 1), sides)]
        out += band(np.array(clicks), low, high)
    return out


def scene(pop_room_db=-5):
    """Slime and table in the room; pops on the near surface face the microphones and sound drier."""
    crunch = crackle()
    snaps = pops() + plops()
    body = crunch + table(crunch) + bubbling() + slaps() + squirts() + bumps()
    return body + snaps + room(body + from_db(pop_room_db) * snaps) + background()


def record(dry):
    """Peaks beyond full scale clip; a steep low-pass cuts the top."""
    low_pass = signal.ellip(10, .2, 80, CUTOFF_HZ, fs=SR, output="sos")
    return signal.sosfilt(low_pass, np.clip(dry, -1, 1))


dry = scene()
out = record(dry)
inscribe(out)
```